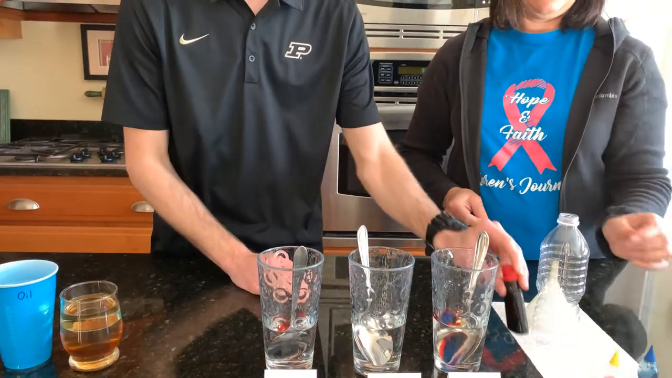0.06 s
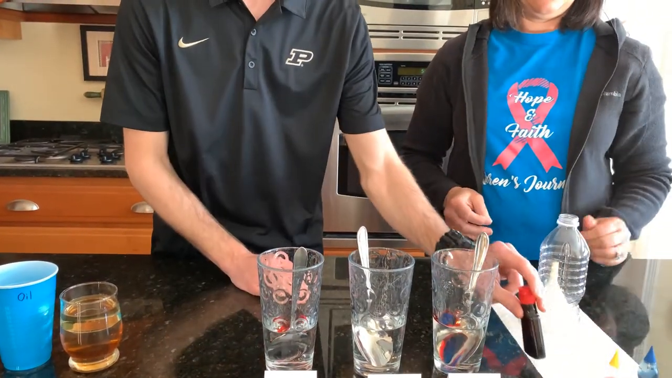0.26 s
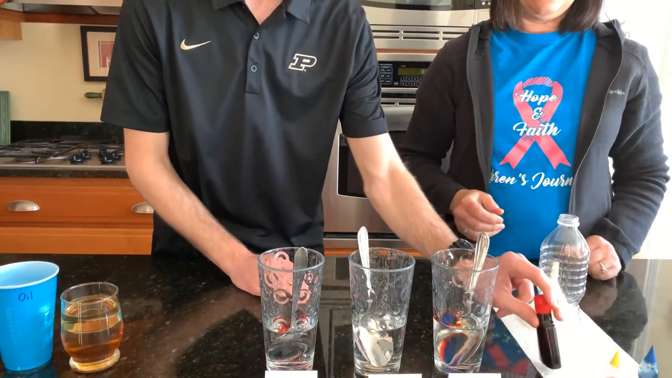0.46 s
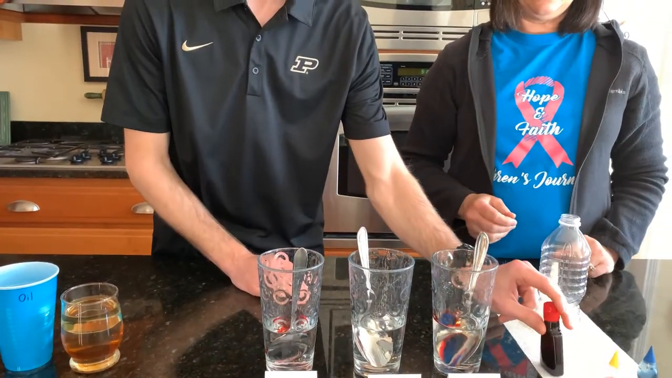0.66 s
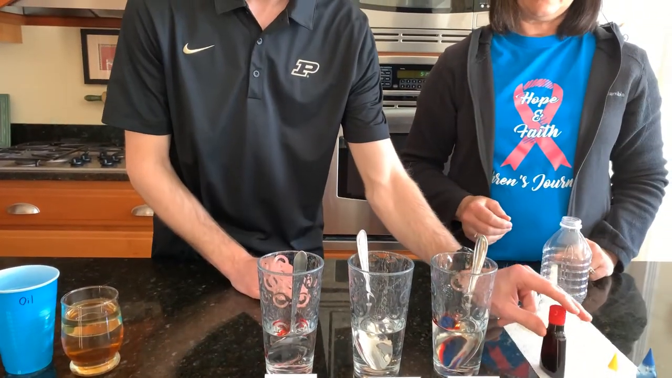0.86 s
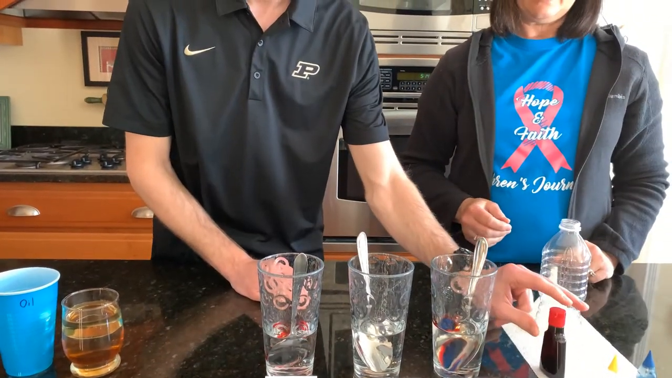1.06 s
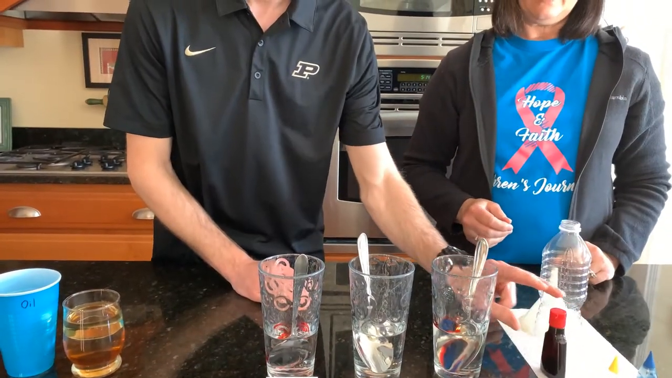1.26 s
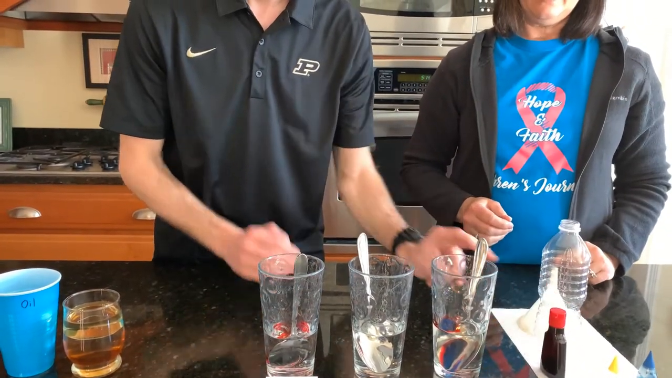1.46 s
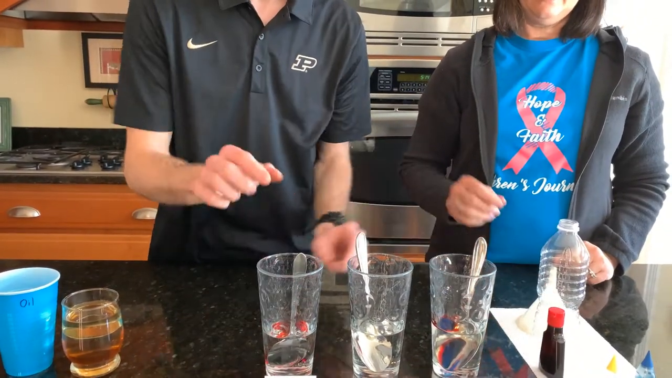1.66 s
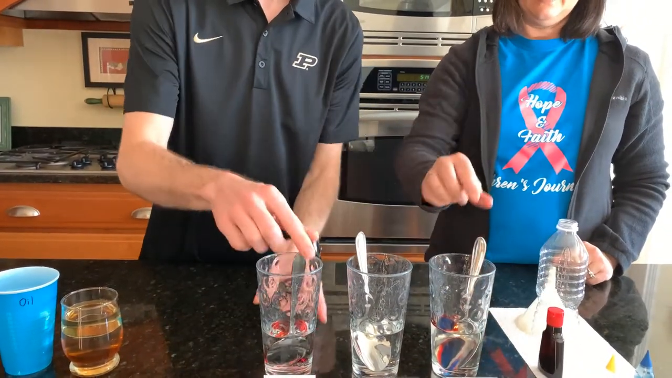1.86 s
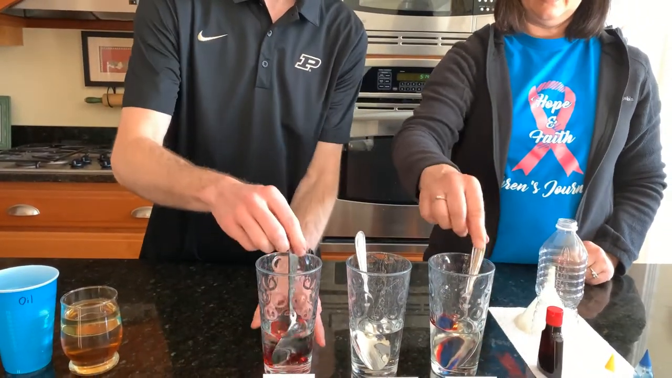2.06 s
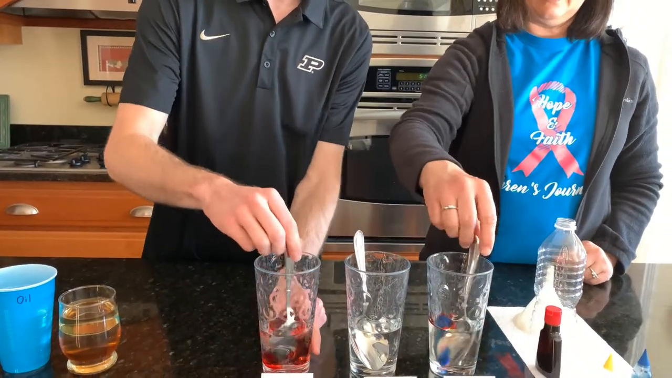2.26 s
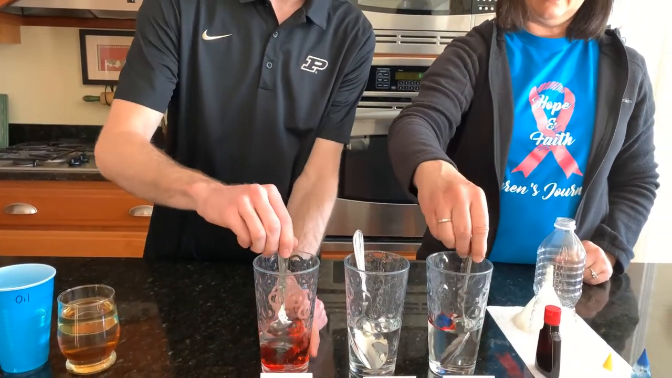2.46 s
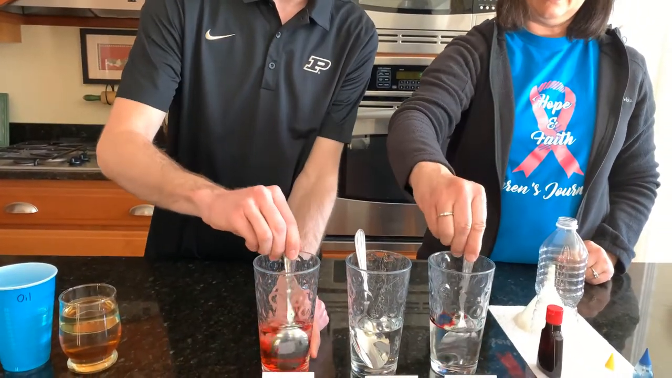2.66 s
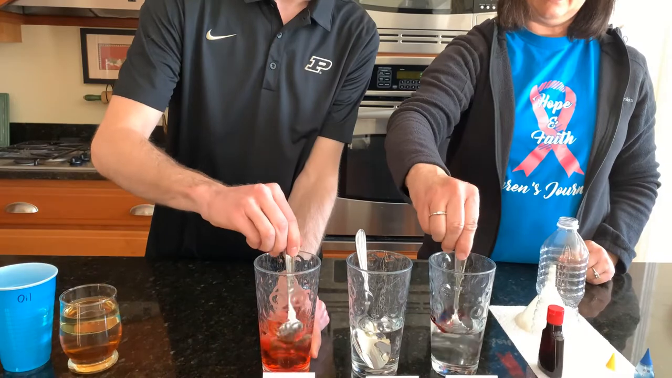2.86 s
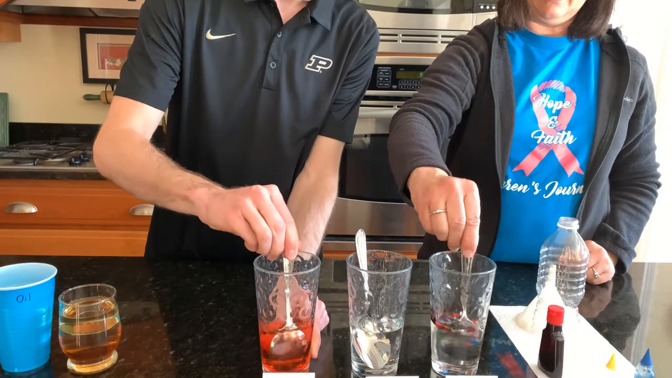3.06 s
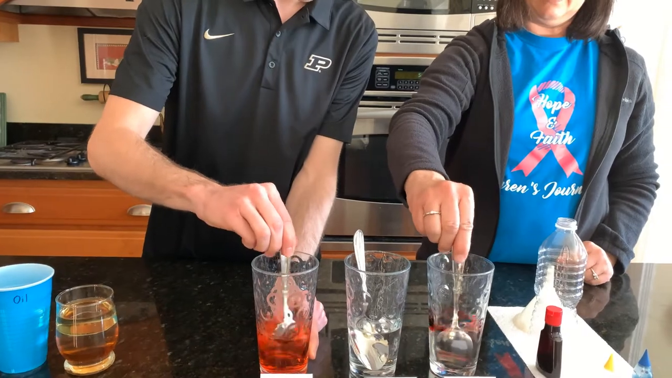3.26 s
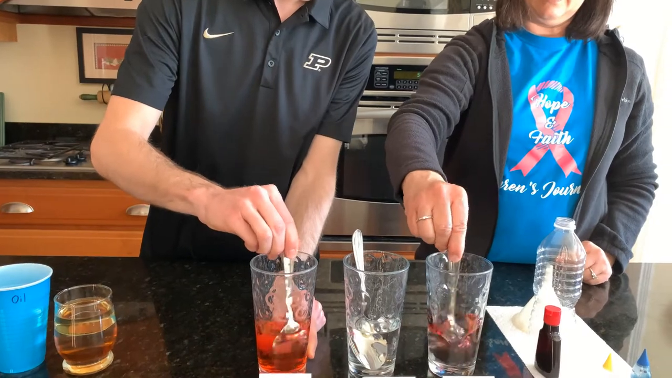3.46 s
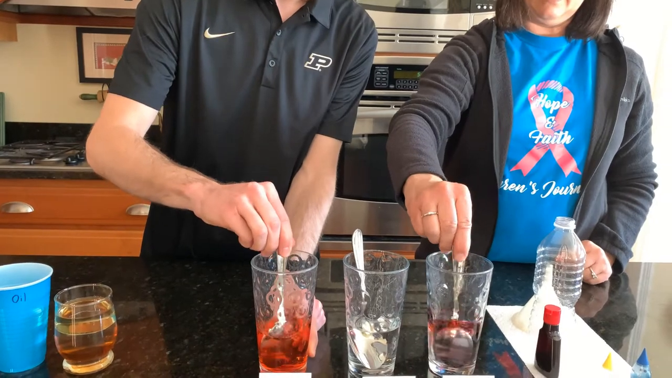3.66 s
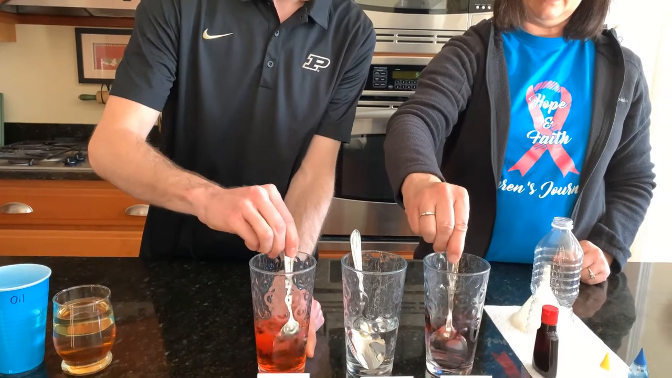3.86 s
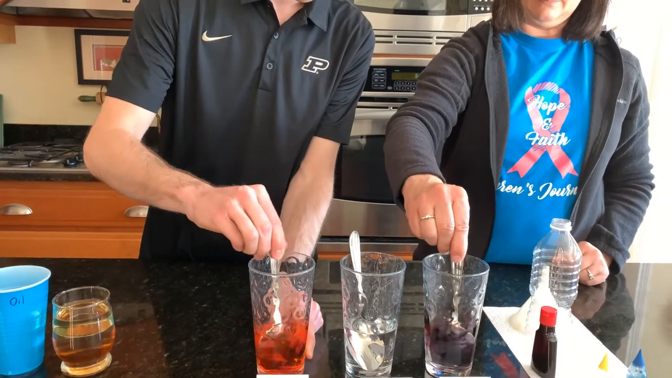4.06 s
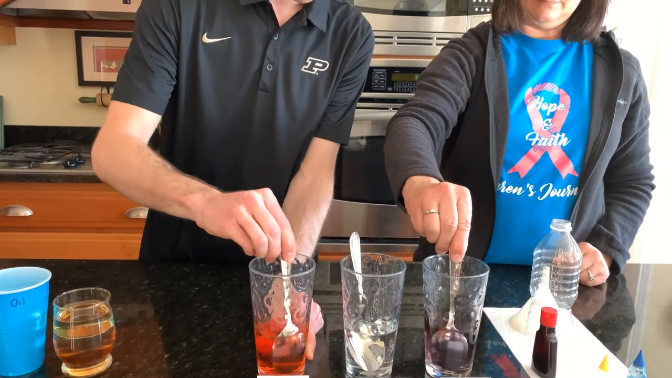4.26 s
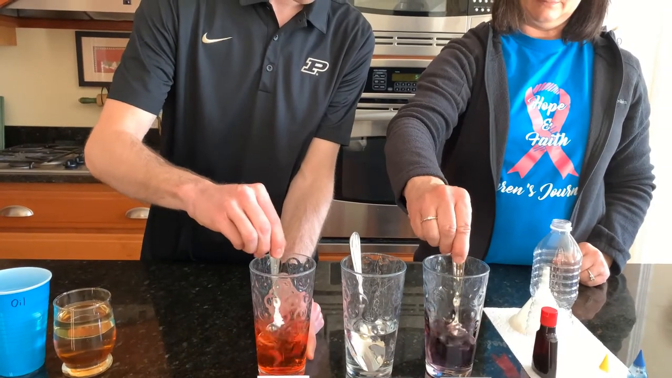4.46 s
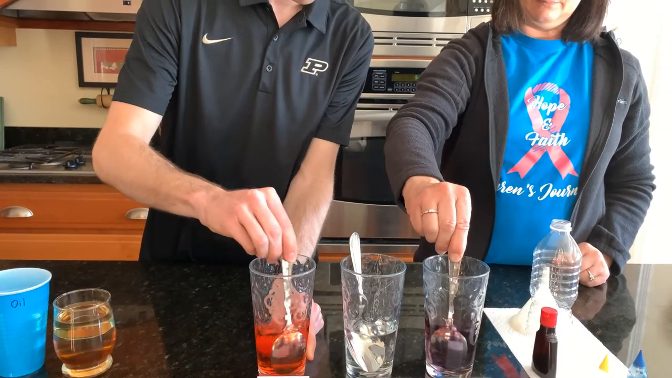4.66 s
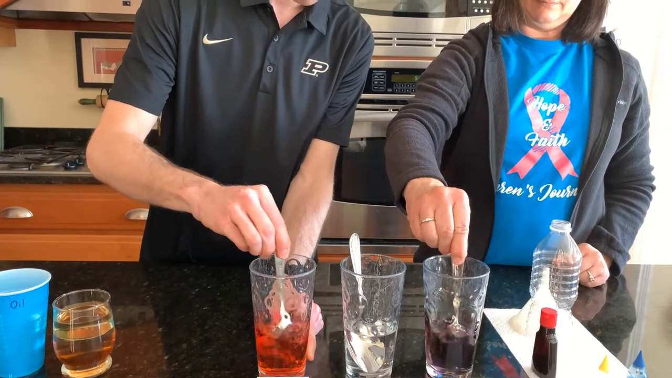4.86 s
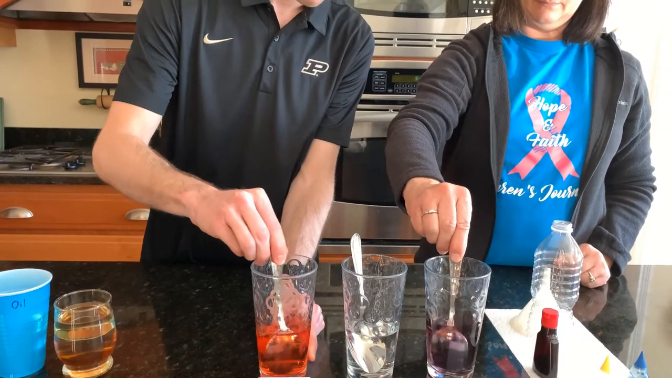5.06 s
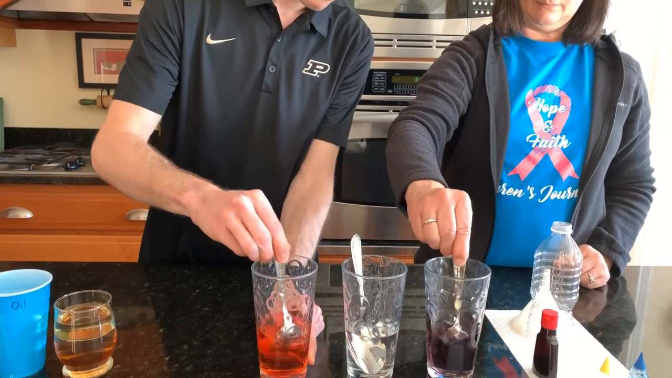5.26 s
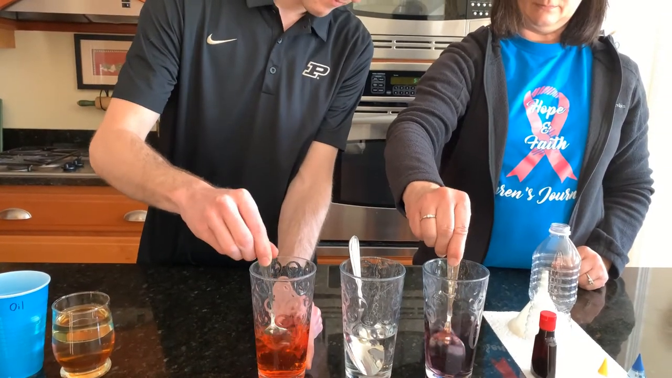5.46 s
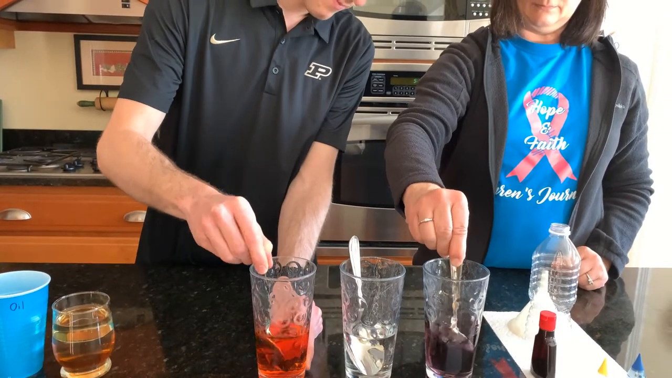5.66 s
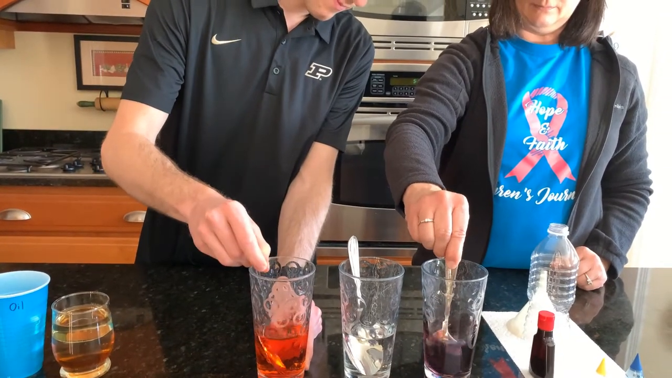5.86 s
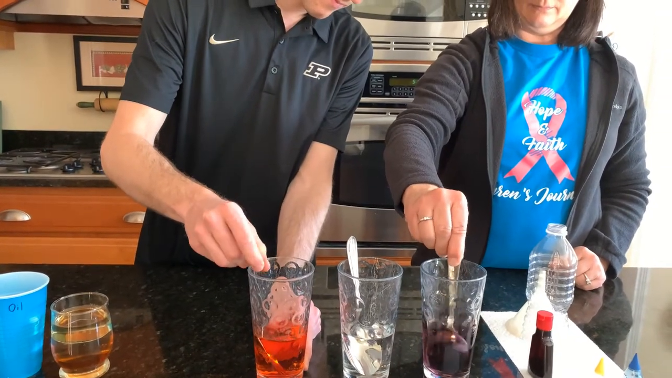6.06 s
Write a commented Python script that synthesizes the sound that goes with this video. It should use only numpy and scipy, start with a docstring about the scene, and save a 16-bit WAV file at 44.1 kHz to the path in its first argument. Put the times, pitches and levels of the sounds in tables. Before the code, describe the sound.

Two spoons clink and scrape against drinking glasses in an uneven rhythm as the liquid inside softly swirls and plops.

```python
"""Metal spoons clink and scrape in two tall glasses as two people stir drinks on a stone kitchen counter.
Each contact excites damped modes: the free right glass rings on, while the left one, steadied by a hand,
rings shorter and higher. The loosely held right spoon adds its own note. Water sloshes, and trapped air
resonates as bubbles and plops. A small bottle is set down before the stirring begins.
The kitchen reverberates over a low rumble and an appliance hum."""
import sys
import numpy as np
from scipy import signal
from scipy.fft import rfft, irfft
from scipy.io import wavfile

SR = 44100
rng = np.random.default_rng(int(sys.argv[2]) if len(sys.argv) > 2 else 0)


def int16_out(signal):
    """Quantize to a 16-bit WAV file."""
    q = np.round(np.clip(np.atleast_2d(signal).T, -1, 1) * 32767)
    wavfile.write(sys.argv[1], SR, q.astype(np.int16))


N = 270009
RING_SAMPLES, STRIKE_SAMPLES = 12288, 1323
STIR_START_S = 2.36

# Spoon contacts: start_s, force_db (against a full blow), brightness_db, scrape_fraction, wall_t60_s;
# the right spoon also has spoon_ring_db (its own note, against the force)
RIGHT_CONTACTS = [(2.362, -6.5, -1.5, 0, .2, -24), (2.678, -39, -4.5, 0.33, 0.56, 6),
                  (2.936, -32.5, -5, 0.52, 0.16, 2), (2.997, -22, -5, 1, .06, -3),
                  (3.008, 0, 0.5, 0.044, 0.085, -39), (3.292, -24, 1, 1, .1, -20),
                  (3.556, -20, 6.5, 0, 0.14, -16), (3.59, 2, 1, 0.0083, 0.074, -10),
                  (3.777, -25.5, 0.5, 0.58, 0.076, -8), (3.842, -35, -13, 0.65, 0.072, 9),
                  (4.086, 4.5, -2.5, 0, 0.13, -7.5), (4.269, -22.5, -4.5, 1, 0.1, -12),
                  (4.292, -18, 0, 0.63, 0.25, -14), (4.428, -23.5, -12, 0.57, 0.33, 6),
                  (4.533, 2.5, 2.5, 0.069, .09, -12), (4.701, -23, 4, 0.44, 0.17, -1),
                  (4.742, -19, -3.5, 0.84, .37, -15), (4.849, -26.5, -8.5, 0.67, 0.72, -10),
                  (4.926, 4, -2, 0.11, 0.14, -37), (5.103, -22, 5, 0.83, 0.23, -8),
                  (5.327, 2.5, -4, 0.11, 0.2, 0.5), (5.49, -23.5, -3.5, 0.91, 0.14, 15),
                  (5.559, -49.5, 10.5, 0.71, .07, -5), (5.688, 2.5, -3, 0.097, 0.24, -12.5),
                  (5.837, -15.5, -1, 0.98, 0.053, -5), (5.945, -22, -7, 0.41, 0.31, -5),
                  (6.051, -2, -5.5, 0.13, 0.082, -4.5)]
LEFT_CONTACTS = [(2.476, 1.5, 4.5, 0.045, 0.058), (2.76, -12, 0, 0.31, 0.061),
                 (3.191, -14, -1.5, 0.37, 0.29), (3.388, -4.5, -1, 0.057, 0.038),
                 (3.418, -19, -2, 0.16, 0.23), (3.727, -1, 0, 0.042, 0.086), (3.911, -9.5, 0, 0.28, 0.048),
                 (4.991, -1, 8.5, 0.023, 0.041), (5.225, -19.5, 2.5, 0.85, 0.8),
                 (5.445, 0.5, -8, 0.18, 0.026), (5.774, -21, 1, 0.52, .1), (6.008, -17.5, -1.5, 0.31, 0.11)]
# Modes of each glass with its spoon: pitch_hz, level_db (within the register), t60_s.
# The first is the main wall mode, whose pitch and decay are set anew at each contact.
RIGHT_GLASS_MODES = [(4700, 16, .15), (352, -10.5, 0.02), (698, 3.5, 0.028), (1177, -14, 0.12),
                     (1886, 4.5, 0.28), (2392, 4, 0.044), (3010, 11.5, 0.022), (4150, -27, 0.19),
                     (4800, -41, 0.13), (4800, -16, 0.48), (7570, -17.5, 0.015), (7270, 52, 0.12),
                     (7663, 23, 0.057), (8280, 2, 0.2), (9560, 10.5, 0.043), (9900, -8, 0.38),
                     (10450, 10.5, 0.051), (11200, -1, 0.12), (11400, -3.5, 0.063), (12880, -14, .11),
                     (14400, -11, 0.15), (15200, 7, 0.035), (15130, -11, 0.048)]
LEFT_GLASS_MODES = [(4820, -29, .1), (860, 22, 0.043), (1578, 7.5, 0.16), (1899, 1, 0.38),
                    (2424, -14, 0.15), (3180, -12.5, 0.15), (7800, 31, 0.16), (7340, 4, 0.044),
                    (7820, 1.5, 0.14), (7800, -42, 0.033), (8480, 11.5, 0.046), (9730, 20.5, 0.044),
                    (10300, -25, 0.054), (10400, -5, 0.32), (11100, -34, 0.13), (14280, -15, 0.14),
                    (14950, 1, 0.037), (15450, -1, 0.069)]
# Main wall mode, near steady on the right, sinking on the left as whirling water climbs: time_s, pitch_hz
RIGHT_WALL_PITCH = [(2.4, 4695), (6, 4701)]
LEFT_WALL_PITCH = [(2.5, 4865), (3.4, 4850), (3.8, 4815), (5.5, 4803)]
# Bounds of six registers (air column, rim, wall, upper wall, shimmer, sparkle): edge_hz
REGISTER_EDGES = [300, 1600, 3400, 6200, 8800, 12500, 16500]
# Each register under a full, clean blow, before the gain of its glass: level_db
RIGHT_BLOW_LEVELS = [-35.5, -33, -15.5, -25.5, -24, -29.5]
LEFT_BLOW_LEVELS = [-36.5, -34, -16, -27, -22.5, -31.5]
# Each register's response to a contact: db_per_force_db, db_per_brightness_db, full_scrape_db.
# The wall follows the force, scraping favours the treble, and a dull contact knocks more.
REGISTER_RESPONSE = [(.22, -0.22, -2.5), (.45, -0.17, -1.5), (.98, 0, 1), (.68, 0.48, 12.5), (.69, 1, 9),
                     (.69, 0.77, 8.5)]
# Radiation of each register to the two channels: left_minus_right_db, left_lead_rad
RIGHT_RADIATION = [(0, .2), (1, -.6), (-4.5, -.8), (0, -1.9), (0, 1.5), (0, 2.2)]
LEFT_RADIATION = [(1, .4), (4, -.4), (0, 2.2), (0, -2.1), (0, 1.5), (0, 2.2)]
# Friction spectrum of steel on glass: frequency_hz, relative_db
RASP_SPECTRUM = [(300, -14.5), (520, -28), (760, 5.5), (1000, -1.5), (1500, -4), (2400, -11.5), (3500, -9),
                 (4700, 21), (6200, -7), (7400, 19), (8700, -10), (9800, 0.5), (13000, -16), (15000, -16)]
# Water plops and low, dull knocks of a spoon on the glass bottom: start_s, pitch_hz, level_db, t60_s
PLOPS_AND_KNOCKS = [(3.298, 750, -28, 0.04), (3.594, 707, -14.5, 0.037), (3.915, 492, -42.5, 0.052),
                    (4.048, 730, -34, 0.029), (4.508, 854, -20, 0.1), (4.713, 1000, -34, 0.15),
                    (4.853, 362, -41.5, 0.063), (4.994, 790, -43, 0.025), (5.263, 620, -30.5, 0.057)]
# Wash of moving water: frequency_hz, relative_db
WASH_SPECTRUM = [(150, -13), (380, -6), (750, -20), (1300, -0.5), (2300, -14.5), (3400, -9.5), (6000, -17),
                 (16000, -51)]
# Kitchen reverberation: centre_hz, level_db (against the direct sound), t60_s
REVERB_BANDS = [(315, 5, 0.25), (820, -4, 0.32), (1850, 0.5, 0.42), (5000, -8, 0.41), (7300, -8, 0.38),
                (10200, -12, 0.22), (15100, -11.5, .21)]
# Room rumble: frequency_hz, relative_db
RUMBLE_SPECTRUM = [(15, -27), (25, -16), (53, -9), (92, -13), (137, -6), (301, -14.5), (335, -14.5),
                   (476, -23.5), (591, -16), (641, -28.5), (962, -34), (2160, -42.5), (8590, -49.5),
                   (11300, -43), (16000, -56)]
# Appliance tones: pitch_hz, level_db
HUM_TONES = [(120, -68), (144, -69)]


def glass(contacts, blow_levels, wall_pitch, modes, radiation, gain_db):
    """Impact excitation: where and how hard the spoon lands sets each register's level and the echoes."""
    out = np.zeros((2, N))
    for start_s, force_db, brightness_db, scrape, wall_t60_s, *_ in contacts:
        levels_db = np.array(blow_levels) + np.array(REGISTER_RESPONSE) @ [force_db, brightness_db, scrape]
        wall_hz = np.interp(start_s, *np.transpose(wall_pitch))
        add(out, start_s, kitchen(clink(modes, wall_hz, wall_t60_s, scrape, levels_db, radiation)))
    return out * undb(gain_db)


def clink(modes, wall_hz, wall_t60_s, scrape, levels_db, radiation, touch_s=0.0023, drag_s=0.0054):
    """Modal ringing with an impact crack and friction noise; a glancing spoon rasps more, swells slower."""
    t = np.arange(RING_SAMPLES) / SR
    scrape = np.clip(scrape, .01, .99)
    hz, db, t60_s = np.array(modes, float).T
    detune, scatter, phase = rng.standard_normal((len(hz), 3)).T
    hz = hz * (1 + 0.00289 * detune * hz / REGISTER_EDGES[-3])  # high modes feel the moving water most
    hz[0], t60_s[0] = wall_hz, wall_t60_s  # a spoon that stays on the wall damps it
    amplitude = undb(db + 0.9 * scatter) * np.exp(2j * np.pi * phase)
    pole = np.exp(2j * np.pi * hz / SR) * fade(1 / SR, t60_s)  # rotation and loss per sample
    swell = 1 - np.exp(-t / (touch_s + drag_s * scrape))
    grit = undb(4 * wander(rate_hz=350, size=RING_SAMPLES))
    chatter = unit_rms(swell * fade(t, t60_s=0.092) * grit, STRIKE_SAMPLES)
    crack = undb(-7) * unit_rms(pulse(t, t60_s=0.013, onset_s=touch_s), STRIKE_SAMPLES)
    out = 0
    for lo, hi, level_db, (pan_db, lead_rad) in zip(REGISTER_EDGES, REGISTER_EDGES[1:], levels_db, radiation):
        in_register = np.flatnonzero((hz >= lo) & (hz < hi))
        ring = sum(amplitude[k] * np.cumprod(np.full(len(t), pole[k])) for k in in_register)
        roughness = 0.69 if lo == REGISTER_EDGES[0] else scrape  # the low knock is always rough
        tone = np.sqrt(1 - roughness ** 2) * unit_rms(swell * ring, STRIKE_SAMPLES)
        rasp = noise(RASP_SPECTRUM, RING_SAMPLES, (lo, hi), peaks_db=6) * (roughness * chatter + crack)
        voice = unit_rms(tone + rasp, STRIKE_SAMPLES)
        stereo = unit_rms(undb(opposed(pan_db / 2)).T).T * np.exp(1j * opposed(lead_rad / 2))
        out = out + undb(level_db) * np.sqrt(2) * (stereo * voice).real
    return out


def spoon(pitch_hz=2370, gain_db=-17.5):
    """Free vibration: the loosely held right spoon rings with its own note after each contact."""
    out, t = np.zeros((2, N)), np.arange(RING_SAMPLES) / SR
    note = np.sin(2 * np.pi * pitch_hz * t) * pulse(t, t60_s=0.034, onset_s=0.00061)
    for start_s, force_db, *_, ring_db in RIGHT_CONTACTS:
        add(out, start_s, undb(gain_db + force_db + ring_db) * note)
    return out


def water(bubble_count=520, median_hz=1080, ring_cycles=16):
    """Air entrainment: stirred water gives an uneven wash, many short-lived bubbles, a few big plops and low
    knocks of a spoon on the glass bottom."""
    bubbles, plops = np.zeros((2, N)), np.zeros((2, N))
    starts_s = rng.uniform(STIR_START_S, N / SR, bubble_count)
    for start_s, (pitch, strength, pan_db) in zip(starts_s, rng.standard_normal((bubble_count, 3))):
        hz = median_hz * np.exp(0.84 * np.tanh(pitch / 2))  # a narrow glass limits the bubble size
        add(bubbles, start_s, bubble(hz, ring_cycles / hz) * undb(3 * strength + opposed(pan_db)))
    for start_s, hz, db, t60_s in PLOPS_AND_KNOCKS:
        add(plops, start_s, undb(db) * bubble(hz, t60_s))
    wash = noise(WASH_SPECTRUM, N).real * undb(4.5 * wander(rate_hz=60))
    return slosh_envelope() * undb(-4) * (unit_rms(bubbles) + unit_rms(wash)) + plops


def slosh_envelope(swirl_db=-60.5, wave_db=-56.5, drag_db=17.5, lag_s=0.026, width_s=.02):
    """Forced motion: a steady swirl, and a wave after each left stroke, larger when the spoon drags."""
    t = np.arange(N) / SR
    waves = sum(undb(wave_db + drag_db * scrape) * np.exp(-.5 * ((t - start_s - lag_s) / width_s) ** 2)
                for start_s, _, _, scrape, _ in LEFT_CONTACTS)
    return (undb(swirl_db) + waves) * (t > STIR_START_S)


def bubble(hz, t60_s, rise_per_t60=0.16):
    """Bubble resonance: an air pocket rings and climbs in pitch as it nears the surface."""
    t = np.arange(SR // 8) / SR
    cycles = hz * (t + rise_per_t60 * t ** 2 / (2 * t60_s))
    return np.sin(2 * np.pi * cycles) * pulse(t, t60_s, onset_s=0.0026)


def bottle(start_s=1.258, centre_hz=1040, gain_db=-56):
    """Cushioned impact: a small bottle set down on paper gives a faint, soft bump."""
    out, t = np.zeros((2, N)), np.arange(RING_SAMPLES) / SR
    spectrum = [(centre_hz / 2, -16), (centre_hz, 0), (centre_hz * 2, -30)]
    thud = noise(spectrum, RING_SAMPLES, band_hz=(0, 3400)).real
    add(out, start_s, undb(gain_db) * thud * pulse(t, t60_s=0.15, onset_s=0.0089))
    return out


def kitchen(dry, first_echo_s=0.0034, build_s=0.00057, uncorrelated_hz=1800):
    """Diffuse reverberation: the midrange lasts longest, and the treble differs most between channels."""
    t = np.arange(RING_SAMPLES) / SR
    centre_hz, wet_db, t60_s = np.transpose(REVERB_BANDS)
    hz = np.fft.rfftfreq(len(t), 1 / SR)
    band = np.searchsorted(np.sqrt(centre_hz[1:] * centre_hz[:-1]), hz)
    mid, side = rfft(rng.standard_normal((2, len(t))))
    width = np.minimum(np.sqrt(hz / uncorrelated_hz), 1)
    spectrum = (mid + opposed(width * side)) / np.sqrt(1 + width ** 2)
    response = signal.unit_impulse(len(t))
    for k in range(len(centre_hz)):
        envelope = fade(t, t60_s[k]) * np.clip((t - first_echo_s) / build_s, 0, 1)
        echoes = irfft(spectrum * (band == k), len(t))
        response = response + undb(wet_db[k]) * envelope / np.linalg.norm(envelope) * echoes
    return signal.fftconvolve(dry, response, axes=1)[:, :N]


def room_rumble(mid_db=-63.5, side_ratio_db=-10):
    """Correlated noise: the low rumble of the room is nearly alike in both channels."""
    mid, side = (unit_rms(noise(RUMBLE_SPECTRUM, N).real) for _ in range(2))
    return undb(mid_db) * (mid + undb(side_ratio_db) * opposed(side))


def appliance_hum(waver_db=3, drift_rad=0.3):
    """Amplitude and phase modulation: two low appliance tones waver at random."""
    t = np.arange(N) / SR
    hum = 0
    for hz, db in HUM_TONES:
        amplitude = np.sqrt(2) * undb(db + waver_db * wander(rate_hz=2.27))
        hum = hum + amplitude * np.sin(2 * np.pi * hz * t + drift_rad * wander(rate_hz=11))
    return hum


def noise(points, size, band_hz=(0, SR / 2), peaks_db=0, peak_spacing_hz=110):
    """Spectral shaping: complex noise follows (Hz, dB) points; peaks_db scatters resonances over it."""
    hz = np.arange(size) * SR / size
    inside = (hz >= band_hz[0]) & (hz < band_hz[1])
    hz, spectrum = hz[inside], np.zeros(size, complex)
    point_hz, point_db = np.transpose(points)
    knots = rng.standard_normal(1024)
    peaks = peaks_db * np.interp(hz / peak_spacing_hz, np.arange(len(knots)), knots)
    shape_db = np.interp(np.log(hz + 1), np.log(point_hz), point_db)
    spectrum[inside] = undb(shape_db + peaks) * rng.standard_normal(2 * len(hz)).view(complex)
    return unit_rms(np.fft.ifft(spectrum))


def wander(rate_hz, size=N):
    """Interpolated random values with a spread near 1."""
    knots = rng.standard_normal(1024)
    return np.interp(np.arange(size) / SR * rate_hz, np.arange(len(knots)), knots)


def fade(t, t60_s):
    """Exponential decay, 60 dB in t60_s."""
    return np.exp(-np.log(1000) * t / np.maximum(t60_s, 1e-3))


def pulse(t, t60_s, onset_s):
    """Transient envelope: exponential rise and decay."""
    return fade(t, t60_s) * (1 - np.exp(-t / onset_s))


def undb(db):
    """Decibels to amplitude ratio."""
    return 10 ** (np.asarray(db) / 20)


def unit_rms(x, size=None):
    """Normalisation to rms 1 over the first size samples."""
    return x / np.sqrt(np.mean(np.abs(x[..., :size]) ** 2) + 1e-20)


def opposed(x):
    """Antisymmetric pair: +x left, -x right."""
    return x * np.array([[1], [-1]])


def add(track, start_s, sound):
    """Superposition of a sound on a stereo track."""
    start = int(start_s * SR)
    track[:, start:start + sound.shape[-1]] += sound[..., :N - start]


def scene():
    """Superposition: glasses, spoon, water and bottle sound in the kitchen over its rumble and hum."""
    right = glass(RIGHT_CONTACTS, RIGHT_BLOW_LEVELS, RIGHT_WALL_PITCH, RIGHT_GLASS_MODES,
                  RIGHT_RADIATION, gain_db=-4)
    left = glass(LEFT_CONTACTS, LEFT_BLOW_LEVELS, LEFT_WALL_PITCH, LEFT_GLASS_MODES,
                 LEFT_RADIATION, gain_db=-5.5)
    return right + left + kitchen(spoon() + water() + bottle()) + room_rumble() + appliance_hum()


def record(dry):
    """Band limiting: a steep low-pass filter cuts the treble above 15.9 kHz."""
    return signal.sosfilt(signal.ellip(8, .2, 70, 15900, fs=SR, output="sos"), dry)


dry = scene()
out = record(dry)
int16_out(out)
```